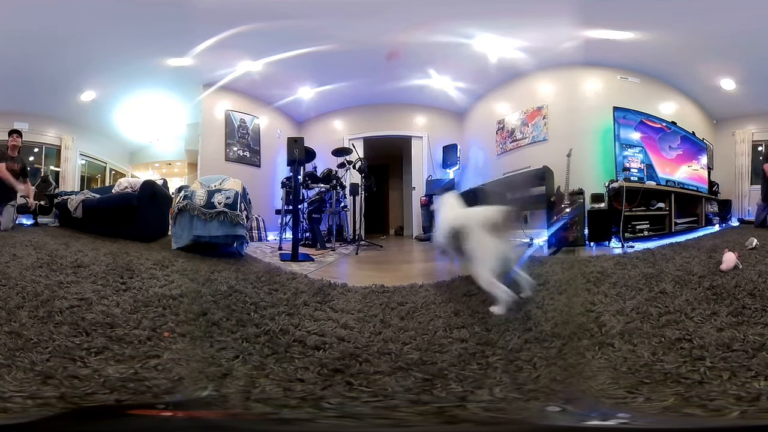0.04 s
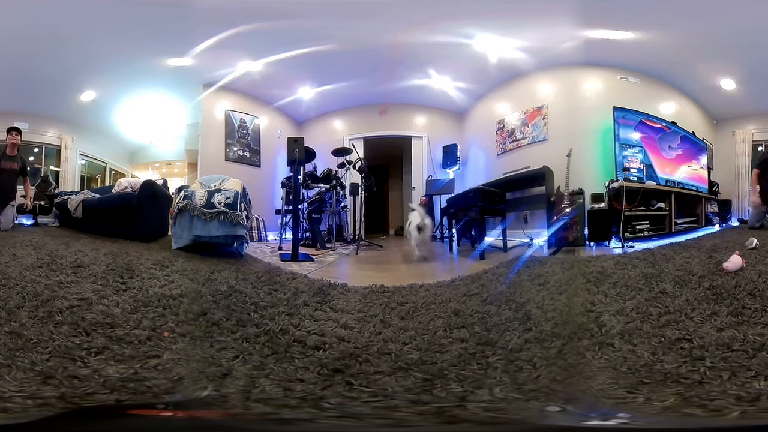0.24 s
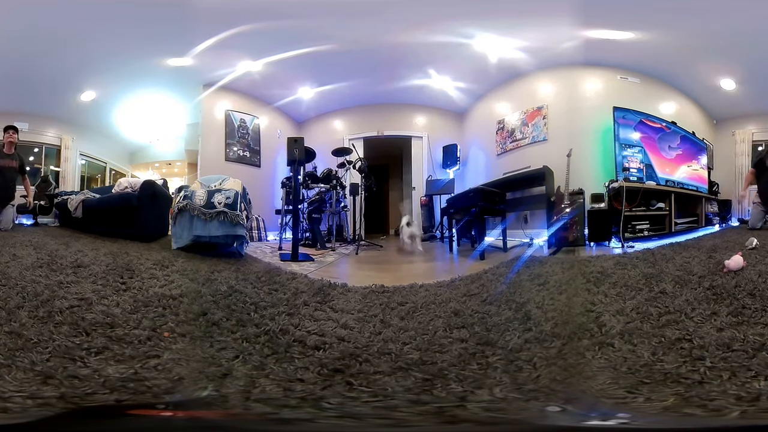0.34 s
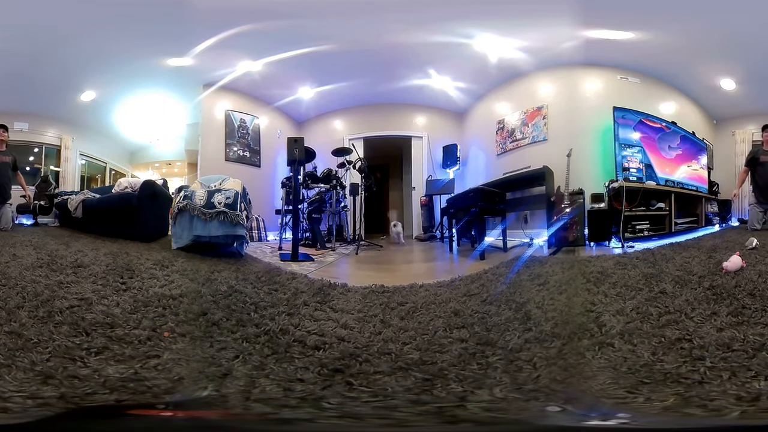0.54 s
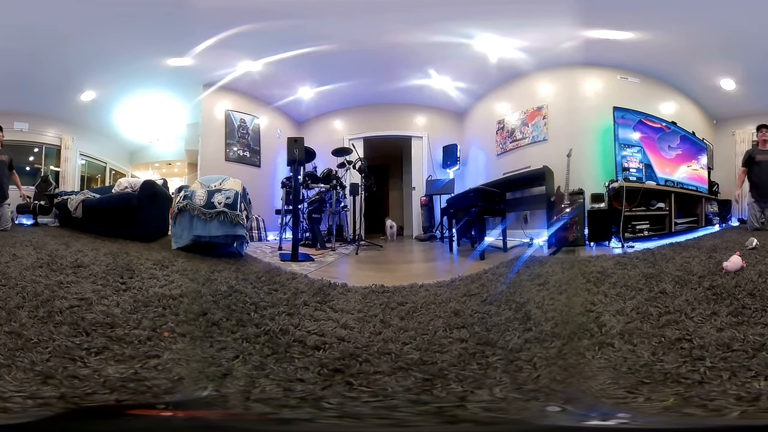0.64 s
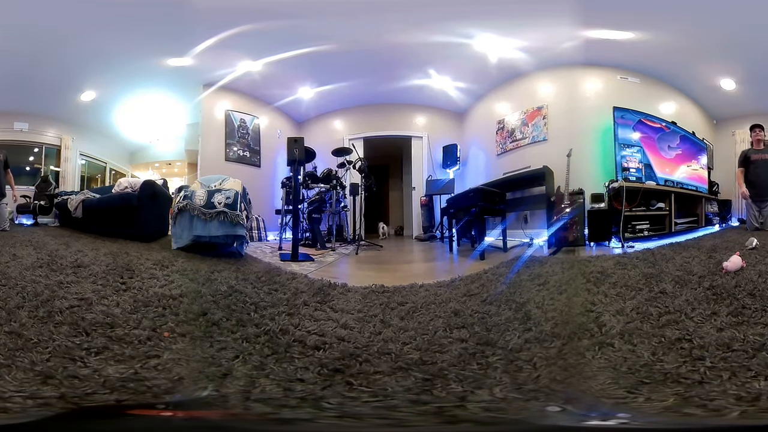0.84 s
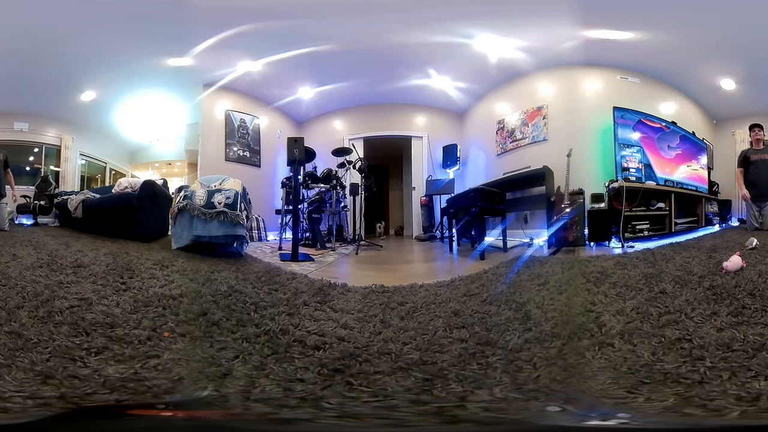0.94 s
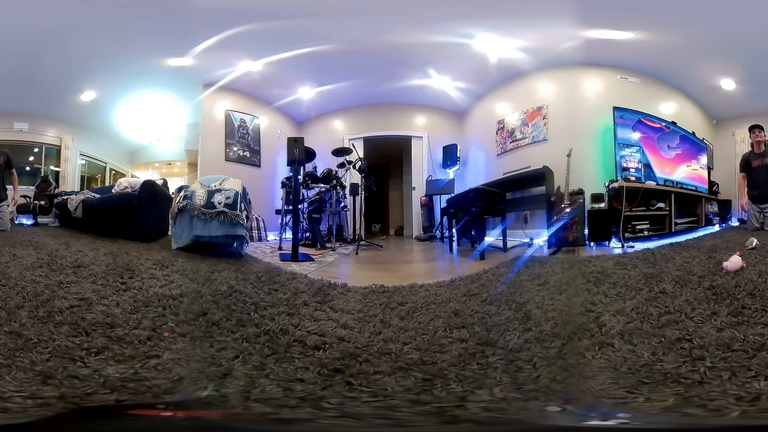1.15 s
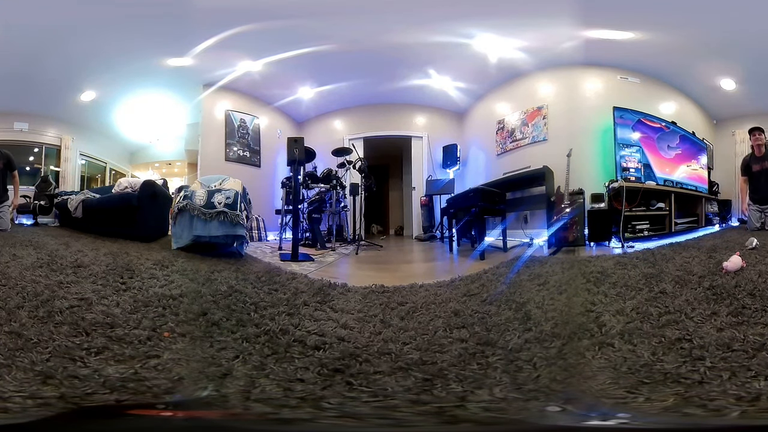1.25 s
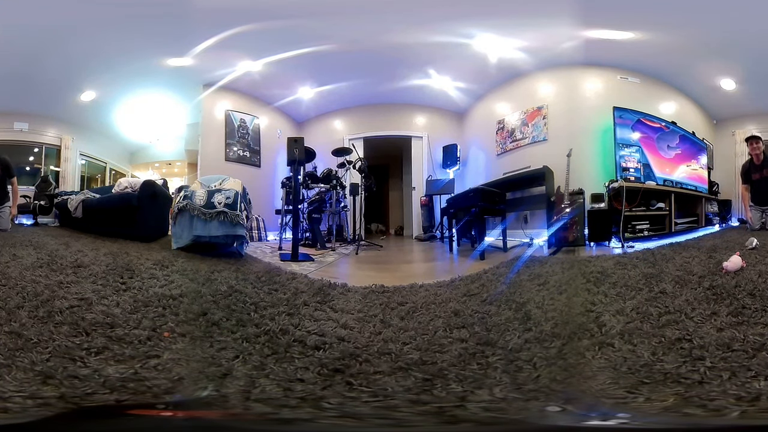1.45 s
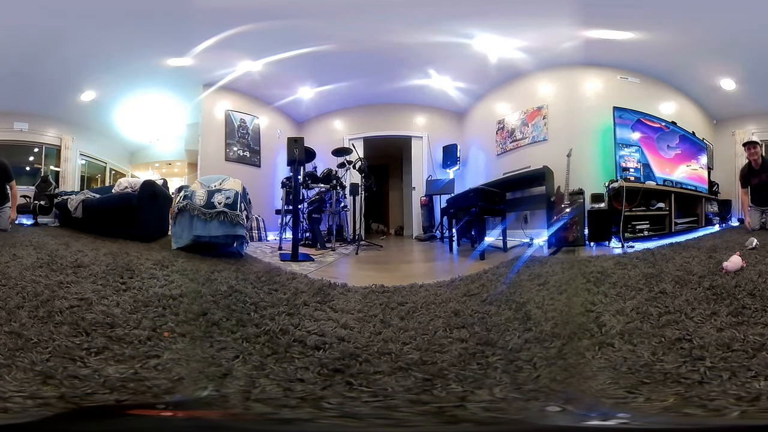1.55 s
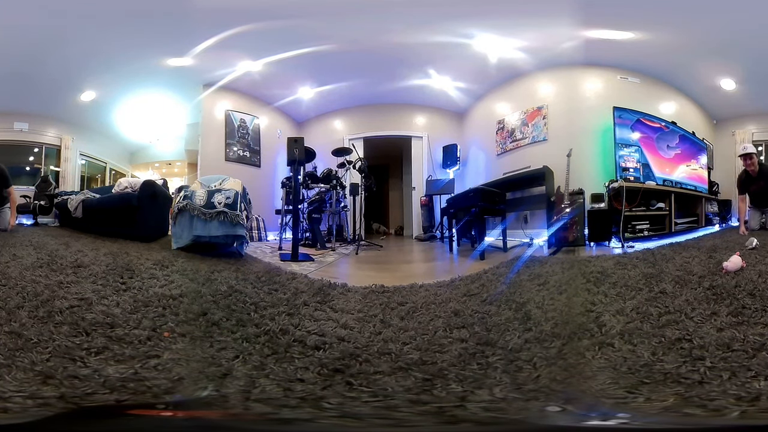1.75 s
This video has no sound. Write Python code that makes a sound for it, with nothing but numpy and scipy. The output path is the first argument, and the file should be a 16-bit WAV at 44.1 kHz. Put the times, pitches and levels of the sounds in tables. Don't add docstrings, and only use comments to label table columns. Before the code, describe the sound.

A small dog's paws scuffle over thick carpet in a living room. Near silence with faint soft thumps until 0.2 s, then crisp, bright scratching bursts: a scuff at 0.2-0.35, denser scrabbling at 0.4-0.7, further bursts around 0.8, 1.0 and 1.2, with claw snaps, skids and dull pad thuds. After 1.3 s the short room echo fades into low hum, hiss, faint regular electrical ticking and a barely audible brush near 1.75.

```python
import sys
import numpy as np
from scipy import signal
from scipy.fft import rfft, irfft
from scipy.io import wavfile
from scipy.ndimage import uniform_filter1d

SR = 44100
rng = np.random.default_rng(int(sys.argv[2]) if len(sys.argv) > 2 else 0)


def inscribe(sig):
    pcm = np.round(np.clip(np.atleast_2d(sig).T, -1, 1) * 32767)
    wavfile.write(sys.argv[1], SR, pcm.astype(np.int16))


def linear_from_db(decibels):
    return 10 ** (np.asarray(decibels, float) / 20)


N = 79380


def level(x, db):
    return x * linear_from_db(db) / np.sqrt(np.mean(x ** 2) + 1e-30)


def curve(table, hz):
    table = np.array(table, float)
    return np.interp(np.log(np.maximum(hz, 1)), np.log(table[:, 0]), table[:, 1])


def colour(x, table):
    gain = linear_from_db(curve(table, np.fft.rfftfreq(len(x), 1 / SR)))
    return irfft(rfft(x) * gain, len(x))


def band(x, hz, q):
    b, a = signal.iirpeak(min(hz, SR / 2.3), max(q, .3, 3 * hz / SR), fs=SR)
    return signal.lfilter(b, a, x)


def resonance(x, hz, q):
    return band(band(x, hz, q), hz, q)


def walk(rate):
    hold = int(SR / rate)
    steps = np.interp(np.arange(N) // hold, np.arange(N), rng.standard_normal(N))
    return 0.82 * uniform_filter1d(uniform_filter1d(steps, hold), hold)


def add(out, s, x):
    i = max(int(s * SR), 0)
    out[i:i + len(x)] += x[:N - i]


def hits(table, t60, q, trim_db, snap_db):
    out, t = np.zeros(N), np.arange(SR // 4) / SR
    snap_s = .004
    noise = rng.standard_normal((len(table), len(t)))
    for (s, db, hz, *fade), puff in zip(table, noise):
        t60_s = fade[0] if fade else t60
        ring = resonance(puff * linear_from_db(-60 * t / t60_s), hz, q)
        snap = band(puff[::-1] * np.exp(-t / snap_s), hz, 0.28)
        hit = ring / abs(ring).max() + linear_from_db(snap_db) * snap / abs(snap).max()
        add(out, s, linear_from_db(db + trim_db) * hit)
    return out


def rubs(table):
    out, t = np.zeros(N), np.arange(SR // 6) / SR
    rise_s, release_s = .001, 0.0018
    noise = rng.standard_normal((len(table), len(t)))
    for (s, length, db, hz, q), n in zip(table, noise):
        rub = resonance(n, hz, q)
        rub = rub / np.sqrt(uniform_filter1d(rub ** 2, size=SR // 100) + 1e-9)
        grip = np.clip(t / rise_s, 0, 1) * np.exp(-np.maximum(t - length, 0) / release_s)
        add(out, s, linear_from_db(db) * rub * grip)
    return out


# frequency in Hz, level in dB per Hz.
PILE_SPECTRUM = [(180, -73), (300, -47), (509, -0.5), (849, 4.5), (1300, -3), (2880, -2), (5300, -0.5),
                 (7500, 0), (15500, -17.5)]


def pile():
    fibres_per_s, fibre_db, fibre_q = 900, 2.5, 2.36
    patch_db, patch_per_s = 1.8, 110
    flutter_db, flutter_per_s = -1.5, 90
    out = 0
    for hz in 350 * 2 ** np.arange(0, 5.6, 1 / 3):
        chance = rng.random((3, N))
        size = linear_from_db(fibre_db * np.minimum(-np.log(chance[2] + 1e-9), 3))
        flicked = chance[0] < fibres_per_s * np.sqrt(hz / 1000) / SR
        flicks = flicked * np.sign(chance[1] - .5) * size
        ring = resonance(flicks, hz, fibre_q)
        ring = level(ring, curve(PILE_SPECTRUM, hz) + 10 * np.log10(hz))
        out = out + ring * linear_from_db(patch_db * walk(patch_per_s))
    return out * linear_from_db(flutter_db * walk(flutter_per_s))


# start in seconds, rise in seconds, hold in seconds, level in dB, brightness in Hz.
PAW_DRAGS = [(0.21, 0.0018, 0.02, -45, 4500), (0.24, 0.0017, 0.056, -40.5, 4900),
             (0.307, 0.018, 0.032, -50, 4940), (0.394, 0.0071, 0.02, -45.5, 3830),
             (0.413, 0.004, 0.035, -40.5, 5240), (0.463, 0.005, 0.045, -39.5, 4670),
             (0.52, 0.033, 0.037, -43, 3430), (.5865, .002, .04, -40.5, 4300),
             (0.625, 0.013, 0.026, -39, 4560), (0.718, 0.039, 0.055, -47, 2680),
             (.775, .048, .032, -37.5, 4500), (0.885, 0.0079, 0.06, -46, 3100),
             (0.958, 0.029, 0.036, -38, 4070), (1.027, 0.0093, 0.062, -39, 4840),
             (1.107, 0.029, 0.032, -45.5, 3340), (1.166, 0.02, 0.039, -39.5, 4660),
             (1.239, 0.0032, 0.055, -49.5, 2240), (1.306, 0.021, 0.035, -64, 2470),
             (1.349, .004, 0.038, -64.5, 2500), (0.664, 0.013, 0.031, -46, 4350)]


def drags():
    release_s, drag_q = 0.018, 0.77
    fibres = pile()
    body = level(band(rng.standard_normal(N), 304, 0.84), -23)
    out, t = np.zeros(N), np.arange(N) / SR
    for s, rise, hold, db, hz in PAW_DRAGS:
        lift = np.exp(-np.maximum(t - s - rise - hold, 0) / release_s)
        press = np.clip((t - s) / rise, 0, 1) * lift
        out += press * linear_from_db(db) * (level(band(fibres, hz, drag_q), 0) + body)
    return out


# start in seconds, peak level in dB, ring in Hz.
CLAW_CATCHES = [(0.2095, -32.5, 3540), (0.2353, -27, 7340), (0.2457, -24.5, 4450), (0.2632, -39, 6400),
                (0.2711, -36, 6230), (0.3144, -25.5, 3900), (0.3395, -27, 2130), (0.4145, -21, 3140),
                (0.433, -22.5, 3930), (0.4596, -28, 3050), (0.4784, -29, 4060), (0.605, -20, 5800),
                (0.6471, -20.5, 7040), (0.733, -32, 2760), (0.793, -25, 4860), (0.8228, -23, 6200),
                (0.8544, -58, 4470), (1.0434, -36, 6100), (1.0748, -18, 4460), (1.0994, -34, 4800),
                (1.2151, -27.5, 1890)]


def claws():
    return hits(CLAW_CATCHES, t60=.04, q=2.4, trim_db=-7, snap_db=-7)


# start in seconds, peak level in dB, ring in Hz.
CLAW_TEARS = [(0.2454, -38, 8980), (0.2616, -21.5, 10600), (0.279, -43, 8870), (0.3301, -25.5, 10800),
              (0.4294, -23, 8900), (0.4746, -23.5, 10800), (0.4874, -27, 8540), (0.6074, -26, 9700),
              (0.6454, -20, 9700), (0.7497, -32, 8790), (0.7967, -25.5, 8500), (0.8203, -25, 8550),
              (0.9834, -28.5, 8610), (1.014, -26, 8400), (1.04, -42, 8510), (1.073, -41, 8830),
              (1.1844, -31, 10600), (1.2004, -24.5, 8600)]


def tears():
    return hits(CLAW_TEARS, t60=0.079, q=0.76, trim_db=-9, snap_db=-7)


# start in seconds, length in seconds, level in dB, ring in Hz, sharpness as Q.
CLAW_RAKES = [
    (.2445, 0.0086, -41, 4900, 1.2),
    (0.265, 0.011, -37, 5300, 0.98),
    (.279, 0.0093, -38, 4900, 1.5),
    (0.614, .005, -42, 5340, 4.9),
    (1.032, 0.021, -47.5, 4770, 4.5),
    (1.097, 0.0093, -42.5, 4900, 5),
]


def rakes():
    return rubs(CLAW_RAKES)


# start in seconds, peak level in dB, ring in Hz, fade as T60 in seconds.
PAD_LANDINGS = [(.188, -44, 563, 0.62), (.232, -34.5, 840, 0.39), (.244, -35.5, 1380, 0.053),
                (.26, -52, 770, 0.11), (.339, -32.5, 560, 0.035), (.635, -39.5, 850, 0.25),
                (.731, -37.5, 667, 0.19), (.732, -43.5, 380, 0.042), (.75, -44, 534, 0.074),
                (.903, -37, 585, 0.037), (1.01, -40, 1930, 0.11), (1.044, -41, 754, 0.034),
                (1.075, -37, 1130, 0.086), (1.156, -38, 1310, 0.044), (1.178, -34.5, 1210, 0.065),
                (1.215, -43, 816, 0.2), (1.232, -42, 1010, 0.048), (1.35, -46, 950, 0.027)]


def pads():
    return hits(PAD_LANDINGS, t60=None, q=2.17, trim_db=-5.5, snap_db=-1.5)


# start in seconds, length in seconds, level in dB, ring in Hz, sharpness as Q.
PAW_SKIDS = [(0.354, 0.015, -46.5, 790, 2.8), (0.413, 0.045, -47.5, 715, 3.2),
             (.457, 0.0096, -37, 2960, 4.8), (.5865, 0.0081, -33.5, 2780, 6.1),
             (.588, 0.0092, -47, 5300, 5.1), (0.586, 0.0068, -45, 1590, 2.6), (0.623, .005, -39, 2980, 4.1),
             (.63, 0.02, -43, 2840, 3.6), (0.633, 0.0097, -44.5, 2120, 4.5), (0.644, .007, -36, 7440, 15),
             (0.7326, 0.0029, -43, 593, 0.81), (.733, 0.005, -44, 1700, 0.74),
             (0.791, 0.0044, -39, 2500, 3.5), (.818, 0.0087, -38.5, 1980, 12), (.819, 0.0061, -43, 2750, 4),
             (.82, 0.039, -47, 1080, 4.9), (0.841, .006, -41.5, 3630, 11), (.851, 0.005, -42, 3650, 2.8),
             (.902, 0.063, -50, 890, 1.5), (.903, 0.0089, -47, 2070, 11), (0.968, 0.0082, -43.5, 3000, 7.5),
             (0.982, 0.0036, -37.5, 2320, 4.4), (1.01, 0.01, -37, 2720, 1.5),
             (1.068, 0.0098, -41, 2470, 2.1), (1.158, 0.087, -48, 720, 1.9),
             (1.157, 0.085, -49.5, 1590, 2.8), (1.171, 0.012, -42, 2470, 3.8), (1.248, .05, -49, 810, 0.87),
             (1.156, .08, -52, 1046, 2.5), (0.961, 0.0081, -44.5, 1730, 3.3),
             (0.986, 0.0092, -50, 1650, 5.3), (1.01, 0.0078, -48.5, 1700, 8.9),
             (1.033, 0.048, -56, 1750, 4.2), (0.2084, 0.0078, -54, 7800, 7.4),
             (0.24, 0.0055, -43.5, 1940, 0.69), (0.628, 0.05, -54.5, 790, 1.4),
             (.7, 0.036, -58.5, 1020, 1.3), (0.938, .014, -59, 1000, 2.2), (1.334, .05, -59, 910, 1.2),
             (1.157, 0.003, -42, 1000, 1)]


def skids():
    return rubs(PAW_SKIDS)


# start in seconds, peak level in dB, ring in Hz.
FLOOR_THUMPS = [(0.03, -55, 62), (0.077, -54.5, 139), (0.097, -57.5, 111), (0.194, -51, 143),
                (0.23, -52, 170), (0.328, -46.5, 280), (0.545, -49.5, 158), (0.798, -53.5, 113),
                (0.892, -48.5, 180), (0.977, -57, 104), (1.136, -56, 154), (1.248, -50, 284),
                (1.35, -60, 172)]


def thumps():
    return hits(FLOOR_THUMPS, t60=0.13, q=1.5, trim_db=0, snap_db=-14)


# start in seconds, length in seconds, level in dB, ring in Hz, sharpness as Q.
SOFT_BRUSHES = [(-.05, .25, -73, 4500, .5), (.05, .07, -70, 600, .8), (.165, .08, -64, 7050, 16),
                (.17, .04, -71, 1300, 3), (.187, .03, -59, 1250, 1.3), (.16, .028, -73, 9500, 2),
                (1.69, .17, -80, 7250, 12), (1.70, .15, -75, 7000, 1.3), (1.71, .15, -75, 1500, 7),
                (1.745, .1, -74, 795, 18), (1.71, .13, -76, 2100, 2.5), (-.06, .18, -58, 22, .8),
                (-.02, .145, -64, 90, 1.5), (.2, 1.3, -70, 58, 1.5), (1.22, .26, -78, 14000, 4),
                (.9, .075, -68, 14500, 4)]


def brushes():
    out, t = np.zeros(N), np.arange(N) / SR
    for s, length, db, hz, q in SOFT_BRUSHES:
        arch = np.sin(np.pi * np.clip((t - s) / length, 0, 1))
        swell = np.sqrt(arch.clip(0))
        out += swell * level(resonance(rng.standard_normal(N), hz, q), db)
    return out


# frequency in Hz, T60 in seconds.
ROOM_FADE = [(200, 0.73), (1000, 0.42), (3000, 0.54), (7000, 0.25), (14000, 0.27)]


def room(x):
    room_db, gap_s = -8, 0.0078
    t, echo = np.arange(SR) / SR, 0
    for hz in 90 * 2 ** np.arange(0, 7.6, .5):
        wash = level(band(rng.standard_normal(SR), hz, 2.07), 10 * np.log10(hz))
        echo = echo + wash * linear_from_db(-60 * t / curve(ROOM_FADE, hz))
    echo = echo * np.clip(t / gap_s - 1, 0, 1)
    return signal.fftconvolve(x, linear_from_db(room_db) * echo / np.sqrt(np.sum(echo ** 2)))[:N]


# frequency in Hz, level in dB per Hz.
HUSH_SPECTRUM = [(13, -90), (22, -9.5), (59, -9), (87, -18.5), (135, -16.5), (275, -24), (333, -20.5),
                 (382, -25), (15500, -44)]


def hush():
    return level(colour(rng.standard_normal(N), HUSH_SPECTRUM), -67.5)


def electrical_tick():
    tick_hz, ticks_per_s, start_s, tick_s = 6850, 29.97, .0050, .008
    t = np.arange(N) / SR
    since = (t - start_s) % (1 / ticks_per_s)
    pulse = np.sin(np.pi * np.clip(since / tick_s, 0, 1))
    return linear_from_db(-74.5 + 2 * walk(30)) * pulse * np.sin(2 * np.pi * tick_hz * t)


def scene():
    dog = drags() + claws() + tears() + rakes() + pads() + skids() + thumps()
    return (dog + room(dog) + brushes() + hush() + electrical_tick())[None]


def roll_off(x):
    return signal.sosfilt(signal.butter(12, 15740, fs=SR, output="sos"), x)


def record(dry):
    top_cut = signal.ellip(8, .2, 70, 15750, fs=SR, output="sos")
    x = signal.sosfilt(top_cut, dry)
    t = np.arange(N) / SR
    lost = uniform_filter1d(1. * ((t > .186) & (t < .216)), size=100)
    treble = signal.ellip(14, .0001, 40, 8900, "high", fs=SR, output="sos")
    mix = x - lost * signal.sosfiltfilt(treble, x)
    return roll_off(mix)


dry = scene()
out = record(dry)
inscribe(out)
```